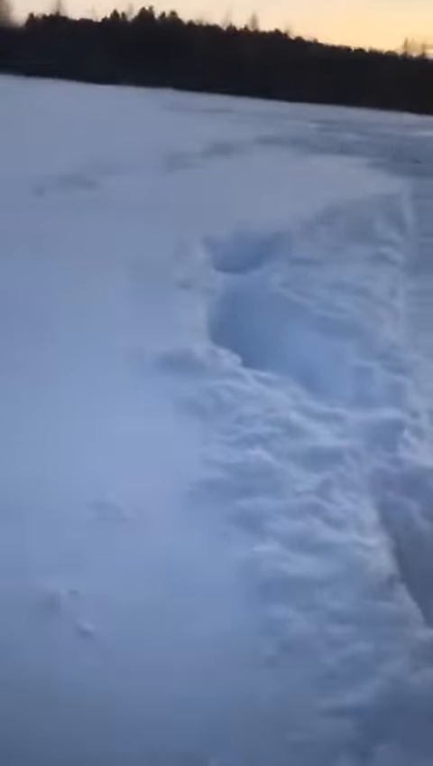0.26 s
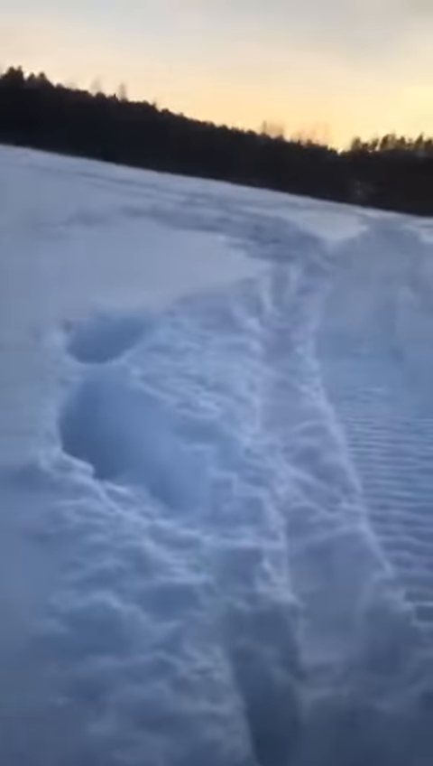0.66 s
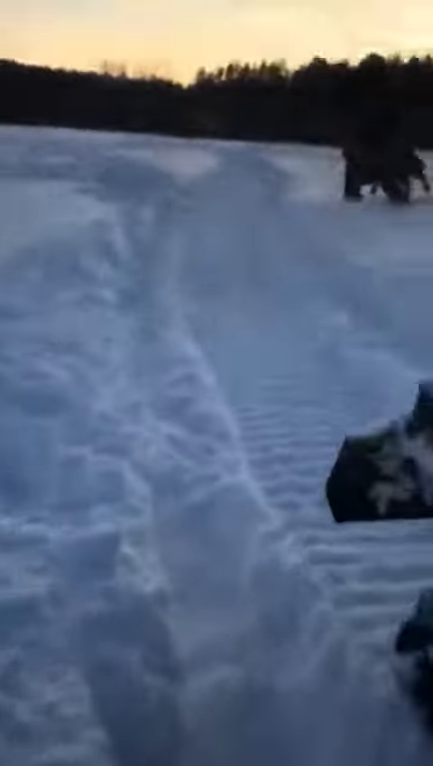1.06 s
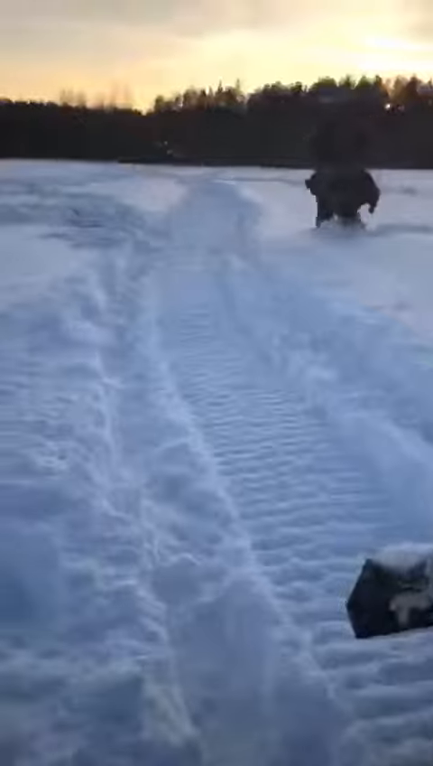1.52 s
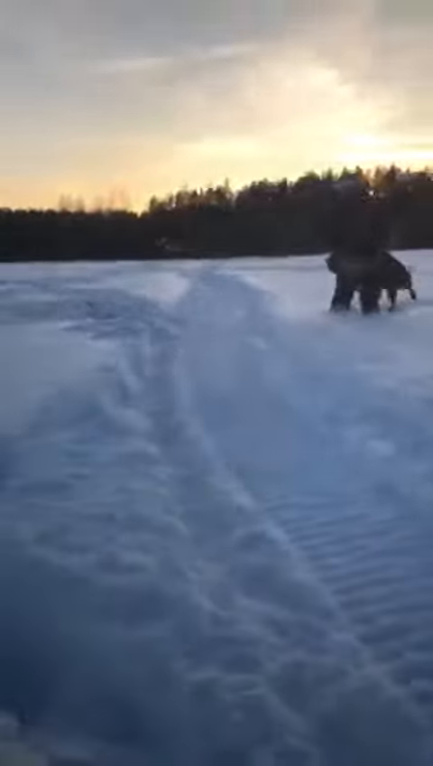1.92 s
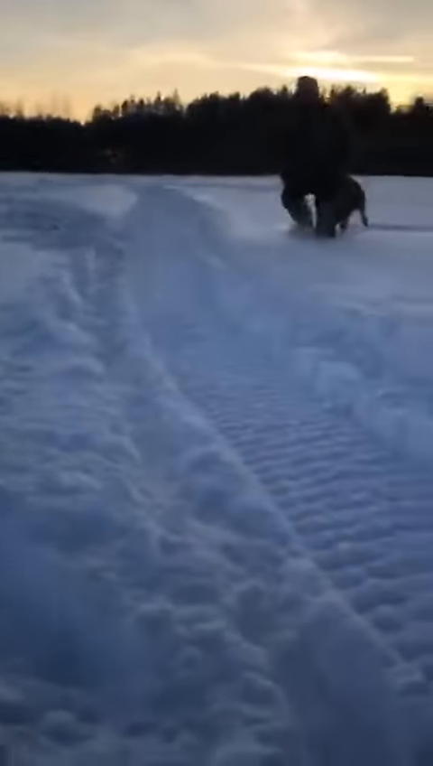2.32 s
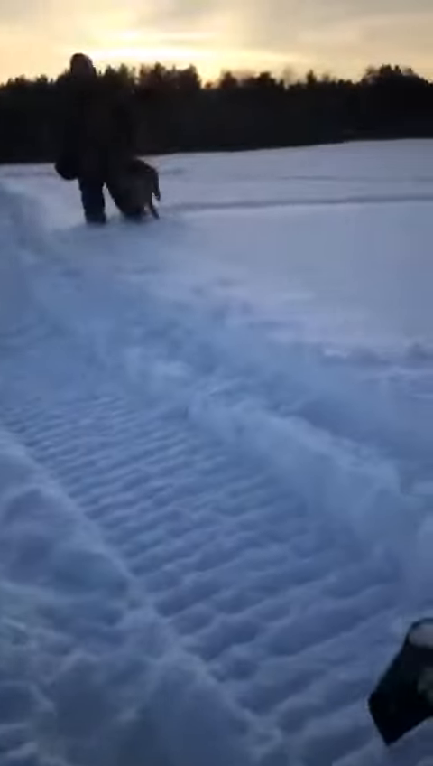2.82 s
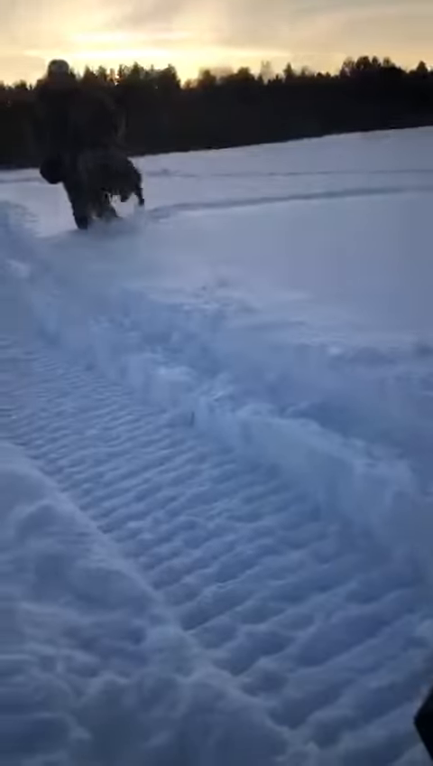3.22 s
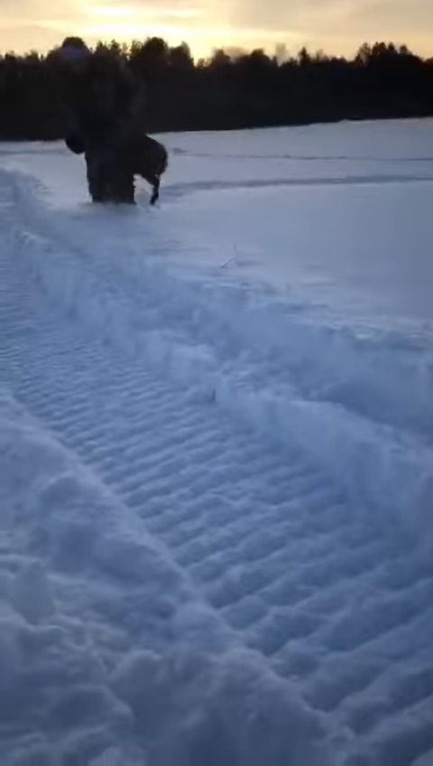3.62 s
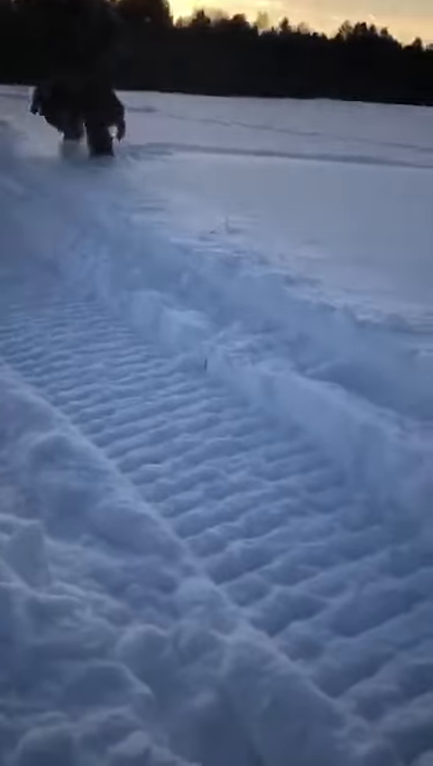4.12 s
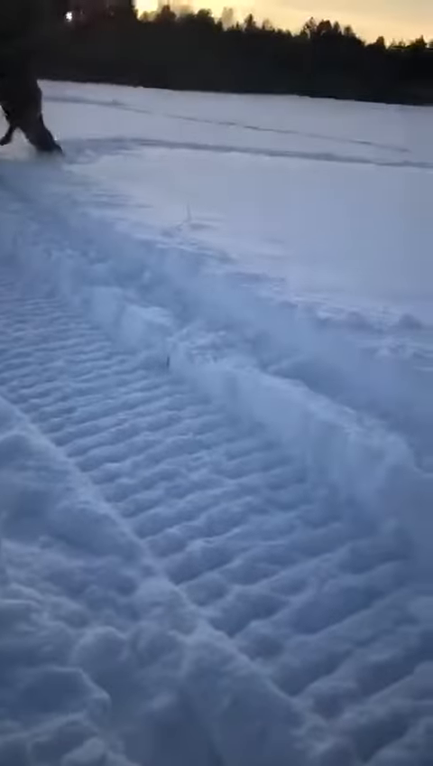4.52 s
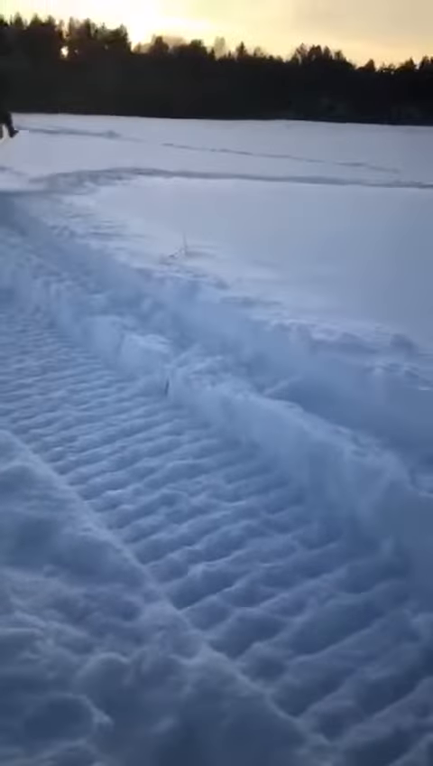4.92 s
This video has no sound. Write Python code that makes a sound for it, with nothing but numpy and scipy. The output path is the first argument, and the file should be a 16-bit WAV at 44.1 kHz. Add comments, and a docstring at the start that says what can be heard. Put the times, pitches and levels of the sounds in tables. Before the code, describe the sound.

A wild boar screams loudly in an open snowy field, with almost no echo. The first cry, a shrill, raspy whistle on a steady high pitch, is already under way, grows louder and drops off in a short yelp at about 1.3 seconds. At 1.6 a throaty creak climbs into a second scream, very hoarse at first, held until 2.7. Quick creaks at 3.1 open the third and strongest cry, which starts rough, rises in pitch and collapses at 4.7. A fourth creaks in just before 5 seconds and is still sounding at the end. Underneath, a nearby engine idles with a quieter, lumpy low throb, fading steadily as the microphone turns away. Soft, dull boot crunches in packed snow come irregularly, around 2.1 to 2.8, at 3.3, and most clearly near 4 seconds. A faint hiss of air runs throughout.

```python
"""A captured wild boar screams four times in an open snowy field, heard on one microphone.
A cry starts as a creak, then climbs to a shrill whistle that a slower vibration of the vocal folds
chops into side tones and rasp; the first is already under way. An engine idles close by, fading as
the microphone turns away. Boots press the snow, the air hisses faintly, and a weak, dull
reverberant tail follows the boar almost at once."""
import sys
import numpy as np
from scipy import signal
from scipy.fft import rfft, irfft, next_fast_len
from scipy.io import wavfile
from scipy.ndimage import uniform_filter1d

SR = 44100
rng = np.random.default_rng(int(sys.argv[2]) if len(sys.argv) > 2 else 0)


def bounce(signal):
    """Save signal as a 16-bit WAV file at the path given by the first command-line argument."""
    frames = np.transpose(np.atleast_2d(signal))
    limited = np.clip(frames, -1, 1)
    pcm = np.round(limited * 32767).astype(np.int16)
    wavfile.write(sys.argv[1], SR, pcm)


N = 227776
TIME = np.arange(N) / SR
FFT_SIZE = next_fast_len(N + SR // 10)
FREQS = np.fft.rfftfreq(FFT_SIZE, 1 / SR)

# Hiss over the field. Each row: frequency in Hz, relative level in dB.
AIR_SPECTRUM = [(350, -3), (550, 1.5), (700, -12.5), (900, -7), (1500, -18.5), (2100, -15.5), (3500, -19.5),
                (5600, -21.5), (10600, -28.5), (12000, -35), (15600, -55)]
# The engine's hum. Each row: multiple of the firing rate, relative level in dB.
ENGINE_ORDERS = [(1, -9.5), (2, -1), (3, 2.5), (4, -1), (5, -13.5), (6, -15), (7, -13), (8, -11), (9, -10),
                 (10, -23), (12, -41)]
# Rumble of its casing. Each row: frequency in Hz, relative level in dB.
RUMBLE_SPECTRUM = [(20, -27), (60, 3), (110, 3.5), (170, -6), (290, -2.5), (400, -10.5), (500, -6),
                   (620, -45), (1200, -20)]
# The microphone turns away from the engine. Each row: time in seconds, casing gain in dB.
ENGINE_FADE = [(0, -33.5), (1.3, -38.5), (2.3, -42), (3.5, -44), (4.3, -48), (5.16, -49.5)]
# Boots on snow. Each row: start in seconds, gain in dB, length in seconds, ring frequency in Hz.
BOOT_STEPS = [(0.115, -35, 0.051, 268), (0.22, -35.5, 0.034, 160), (0.664, -36, 0.036, 190.5),
              (1.242, -32, 0.039, 180), (2.123, -31, 0.024, 218), (2.251, -32.5, 0.019, 278),
              (2.444, -35.5, 0.037, 236.7), (2.542, -30, 0.02, 169), (2.61, -37, 0.035, 150.2),
              (2.803, -34, 0.021, 447), (3.226, -28.5, 0.032, 244), (3.304, -27.5, 0.058, 320),
              (3.927, -30, 0.065, 306.7), (3.95, -27, 0.049, 79.7), (4.032, -26, 0.047, 293),
              (4.121, -27, 0.034, 218.3), (4.151, -20.5, 0.044, 171)]
# Creaks ahead of a cry. Each row: start in seconds, relative peak in dB, tilt in dB per octave.
FOLD_CREAKS = [(1.582, -11.5, -2), (3.091, -6, 6.5), (3.108, -5, 3), (3.123, -0.5, 4), (4.928, -14.5, -1),
               (4.947, -7, -0.5), (4.963, -8.5, 5.5), (4.978, -8.5, -1)]
# What a creak rings. Each row: nominal frequency in Hz, relative level in dB, seconds to fall 60 dB.
THROAT_MODES = [(724.8, 6, 0.081), (1231.3, 6.5, 0.025), (2210, 10, 0.026), (2780, 3.5, 0.025),
                (4180, 0, 0.0053), (6034, -7.5, 0.016)]
# Tones beside each whistle partial. Each row: offset in multiples of the fold rate, gain in dB.
FOLD_SIDE_TONES = [(-2, -13), (-1.5, -33), (-1, -8), (-.5, -23), (.5, -23), (1, -4.5), (1.5, -15.5),
                   (2, -13.5)]
# The throat's colour. Each row: frequency in Hz, gain in dB.
THROAT_SPECTRUM = [(1100, -40), (1450, -7.5), (1700, 1), (1900, 4), (2150, 3), (2400, 7.5), (2820, -0.5),
                   (3020, -8.5), (3300, -15), (3850, -16.5), (4700, -15), (5200, -12.5), (5800, -18),
                   (7500, -19), (8500, -22.5), (9600, -21), (11500, -30.5)]
# Edges in Hz of the voice's core, mouth, upper, treble and fizz bands, low to high.
VOICE_EDGES_HZ = [1050, 2200, 3200, 5200, 8600, 12500]
# How a band follows the voice. Each row, by name: usual gain in dB, dB per dB of effort,
# dB per unit of roughness, dB per octave of held pitch, weight of the cry's brightness.
BAND_RULES = {"growl": (-35, 0.2, 20.5, 21, 1.94), "upper": (-26.5, 0.53, 9, -10.5, 1.53),
              "treble": (-26, 0.51, 3.5, -3, 0.77), "fizz": (-32, 0.53, -0.5, 9, 0.36)}
# Drift of the top two bands. Each row: time in seconds, treble offset in dB, fizz offset in dB.
TREBLE_DRIFT = [(.08, -5.5, 2), (.28, 5.5, -5.5), (.55, -3.5, 2.5), (.85, -3, 2.5), (1.03, 2, -3),
                (1.24, 2, -7), (1.8, 0.5, 1.5), (1.96, -1, 2), (2.15, -0.5, 2.5), (2.28, 4, -9),
                (2.41, 3.5, -4), (2.54, 1, 1.5), (3.2, -4.5, 0), (3.58, 1.5, 0), (3.8, 3.5, 2),
                (4.2, 0.5, -3.5), (4.6, -4, -3)]
# The cries. Each row: start and climb time in seconds, starting pitch in Hz, starting level in dB
# below the hold, end of the hold and collapse time in seconds, brightness in dB, first and last
# treble resonance in Hz before the jaw shifts it.
BOAR_CRIES = [(-.05, .04, 1400, 7, 1.33, 0.034, -2.5, 5950, 6500),
              (1.58, .105, 1200, 36, 2.668, 0.076, 0.5, 6400, 5700),
              (3.122, .046, 1399, 4, 4.632, 0.06, 0.6, 7330, 6400),
              (4.988, 0.055, 1098, -4, 5.244, .06, -0.5, 5950, 5700)]
# The held whistle, a list per cry. Each row: time in seconds, pitch in Hz, effort in dB.
CRY_HOLDS = [
    [(0.0, 1924, -20), (0.128, 1920, -22.5), (0.194, 1893, -20.5), (0.282, 1874, -26), (0.3, 1930, -24),
     (0.33, 1850, -28.5), (0.348, 1943, -20), (0.386, 1876, -20.5), (0.68, 1858, -14), (0.752, 1872, -16.5),
     (0.848, 1895, -11), (0.962, 1890, -15), (1.256, 1878, -10.5), (1.32, 1855, -11.5)],
    [(1.69, 1923, -23.5), (1.72, 1894, -16.5), (1.814, 1894, -10.5), (1.82, 1835, -12.5),
     (1.85, 1796, -11.5), (1.91, 1840, -17), (1.926, 1887, -18), (2.068, 1861, -13.5), (2.216, 1843, -17),
     (2.284, 1850, -14), (2.342, 1839, -20), (2.41, 1843, -21), (2.532, 1845, -13), (2.67, 1834, -11.5)],
    [(3.17, 1620, -21.5), (3.206, 1709, -16.5), (3.364, 1806, -12.5), (3.384, 1878, -13),
     (3.482, 2016, -18), (3.526, 1933, -9.5), (3.6, 1927, -14), (3.658, 1929, -11), (3.832, 1910, -18.5),
     (4.024, 1961, -13.5), (4.166, 1964, -16.5), (4.528, 2002, -11), (4.612, 1945, -9.5),
     (4.63, 2012, -7.5)],
    [(5.04, 1920, -26.5), (5.056, 2004, -18), (5.074, 2085, -20.5), (5.15, 2066, -14.5), (5.16, 2052, -15)],
]
# The mouth resonance, a list per cry. Each row: time in seconds, level in dB.
CRY_MOUTH = [
    [(0, -27.5), (.5, -26), (.9, -19.5), (1.1, -23.5), (1.27, -20)],
    [(1.7, -25.5), (1.82, -21), (1.93, -21.5), (2.04, -16.5), (2.24, -28), (2.37, -28), (2.52, -23.5),
     (2.67, -23.5)],
    [(3.15, -23), (3.24, -28), (3.45, -22), (3.57, -14.5), (3.68, -18.5), (3.85, -18.5), (4.13, -21),
     (4.38, -13.5), (4.62, -16.5)],
    [(5.035, -35), (5.06, -19), (5.14, -17.5)],
]
# Hoarseness, a list per cry. Each row: time in seconds, roughness from 0 to 1.
CRY_ROUGHNESS = [
    [(0, 0.29), (.35, 0.32), (.6, 0.28), (.8, 0.36), (1.03, 0.28), (1.14, 0.28), (1.27, 0.41)],
    [(1.62, 0.91), (1.7, 0.21), (1.78, .5), (1.86, 0.94), (1.93, 0.25), (2.03, .4), (2.2, 0.23),
     (2.4, 0.19), (2.68, .36)],
    [(3.14, 0.92), (3.33, .6), (3.43, .16), (3.5, 0.24), (3.56, .5), (3.8, 0.41), (4.02, 0.43),
     (4.38, 0.42), (4.62, 0.3)],
    [(4.99, .3), (5.01, 0.13), (5.04, 0.08), (5.055, 0.36), (5.16, 0.36)],
]

USUAL_HZ, USUAL_DB, USUAL_ROUGH = 1900, -14, .33  # pitch, effort and roughness of an ordinary scream


def amp(db):
    """Decibels to gain."""
    return 10 ** (np.asarray(db) / 20)


def unit_rms(x):
    """Scales to rms 1."""
    return x / np.sqrt(np.mean(x ** 2) + 1e-20)


def levelled(x, size=900):
    """Holds the short-term rms at 1."""
    power = uniform_filter1d(uniform_filter1d(x ** 2, size), size)
    return x / np.sqrt(abs(power) + 1e-12)


def follow(rows):
    """The columns of a curve table at every sample."""
    times, *columns = np.transpose(rows)
    return [np.interp(TIME, times, column) for column in columns]


def colour(x, points):
    """Filters by a spectrum of (Hz, dB) points."""
    hz, db = np.transpose(points)
    gain = amp(np.interp(np.log(FREQS + 1), np.log(hz), db))
    return irfft(rfft(x, FFT_SIZE) * gain, FFT_SIZE)[:N]


def band(x, low_hz, high_hz, order=16):
    """Keeps one band; a higher order steepens its edges."""
    loss = (1 + (low_hz / (FREQS + 1)) ** order) * (1 + (FREQS / high_hz) ** order)
    return irfft(rfft(x, FFT_SIZE) / loss, FFT_SIZE)[:N]


def wander(hz):
    """A smooth random curve of rms 1, moving at up to about this rate."""
    spectrum = rfft(rng.standard_normal(FFT_SIZE)) / (1 + (FREQS / hz) ** 4)
    return unit_rms(irfft(spectrum, FFT_SIZE)[:N])


def resonate(x, hz, width_hz):
    """A resonance of gain 1 that follows the curve hz."""
    turn = np.exp(2j * np.pi * np.cumsum(hz) / SR)
    pole = np.exp(-np.pi * width_hz / SR)
    return 2 * (turn * signal.lfilter([1 - pole], [1, -pole], x / turn)).real


def add(mix, start_s, sound):
    """Mixes a sound in at a time."""
    part = mix[max(round(start_s * SR), 0):][:len(sound)]
    part += sound[:len(part)]


def air(level_db=-45):
    """Faint, slightly restless hiss over the open field."""
    return amp(level_db + 0.81 * wander(26)) * unit_rms(colour(rng.standard_normal(N), AIR_SPECTRUM))


def reverb_tail(x, delay_s=0.019, decay_db_per_s=35, gain_db=-41):
    """A weak, dull reverberant tail follows the direct sound almost at once."""
    t = np.arange(SR) / SR
    tail = rng.standard_normal(SR) * amp(-decay_db_per_s * t) * (t > delay_s)
    reverb = signal.fftconvolve(x, tail / np.linalg.norm(tail))[:N]
    return amp(gain_db) * band(reverb, 500, 5000, order=3)


def engine(firing_hz=31.48, exhaust_db=-29, throb_db=2, lumps_db=2):
    """A lumpy idle close by: deep throbbing exhaust, and a casing whose drone and rumble fade faster."""
    casing_db, = follow(ENGINE_FADE)
    firings = np.cumsum(firing_hz * (1 + 0.01095 * wander(2.885))) / SR
    hum = sum(amp(db) * (1 + 0.3 * wander(8.4)) * np.cos(2 * np.pi * (k * firings + rng.random()))
              for k, db in ENGINE_ORDERS)
    exhaust, drone = band(hum, 15, 115), band(hum, 138, 600)
    pulses = rng.standard_normal(N) * (1 + .5 * np.cos(2 * np.pi * firings))
    rumble = colour(pulses * amp(lumps_db * wander(22)), RUMBLE_SPECTRUM)
    casing = amp(-3) * unit_rms(drone) + unit_rms(band(rumble, 18, 1310, order=4))
    idle_db = exhaust_db + 0.73 * (casing_db - casing_db[0]) + throb_db * wander(7)
    return amp(idle_db) * unit_rms(exhaust) + amp(casing_db) * casing


def boots(slips_per_s=260, ring_s=0.00087):
    """Packed snow gives way underfoot in a run of small dull slips."""
    out, t = np.zeros(N), np.arange(SR // 50) / SR
    for start, db, length, hz in BOOT_STEPS:
        size = int(length * SR)
        slips = rng.standard_normal(size) * (0.13 + (rng.random(size) < slips_per_s / SR))
        ring = np.sin(2 * np.pi * hz * t) * np.exp(-t / ring_s)
        crunch = signal.fftconvolve(slips * signal.windows.tukey(size, .5), ring)
        add(out, start, amp(db) * unit_rms(crunch))
    return band(out, 90, 770, order=6)


def creaks(gain_db=-3, scrape_s=0.011):
    """Single slaps of the boar's slack folds ring its throat."""
    out, t = np.zeros(N), np.arange(SR // 20) / SR
    for start, peak_db, tilt in FOLD_CREAKS:
        ring = 0
        for hz, db, t60 in THROAT_MODES:
            decay = amp(db + tilt * np.log2(hz / 2000) - 60 * t / t60)
            ring += decay * np.sin(2 * np.pi * hz * rng.uniform(0.835, 1.08) * t)
        creak = ring + 0.54 * rng.standard_normal(len(t)) * np.exp(-t / scrape_s)
        add(out, start, amp(peak_db + gain_db) * creak / abs(creak).max())
    return band(out, 430, 7840, order=6)


def cry_controls(row, hold, mouth, roughness, attack_s=0.028, sag=.36, drop_db=-50.5):
    """One cry climbs, holds, then collapses: the pitch sags, the level drops, the voice roughens."""
    start, climb_s, start_hz, start_db, end, collapse_s, bright_db, first_hz, last_hz = row
    (hold_hz, hold_db), (mouth_db,), (rough,) = follow(hold), follow(mouth), follow(roughness)
    climb_left = 1 - np.clip((TIME - start) / climb_s, 0, 1)
    collapse = np.clip((TIME - end) / collapse_s, 0, 1)
    hz = (hold_hz + (start_hz - hold_hz) * climb_left) * (1 - sag * collapse ** 1.05)
    octaves = np.log2(hold_hz / USUAL_HZ)
    swell_db = -start_db * climb_left ** 2
    gate = np.clip((TIME - start) / attack_s, 0, 1) * (collapse < 1) * amp(drop_db * collapse ** 1.9)
    # The folds chop deeper when hoarse, less when forced, and lock on only while the whistle holds.
    depth = 0.65 + 0.53 * (rough - USUAL_ROUGH) - 0.06 * (hold_db - USUAL_DB)
    depth = np.clip(depth * (1 - np.sqrt(climb_left)) * (1 - collapse), 0, 1)
    rough = np.clip(rough + .55 * collapse, 0, 1)
    treble_hz = np.interp(TIME, [start, end], [first_hz, last_hz])
    return np.broadcast_arrays(hz, octaves, hold_db + swell_db, mouth_db + swell_db, rough, depth,
                               climb_left, collapse, gate, bright_db, treble_hz)


def cry_sequence():
    """The controls of all four cries; each takes over in the pause before it."""
    controls = 0
    for row, *curves in zip(BOAR_CRIES, CRY_HOLDS, CRY_MOUTH, CRY_ROUGHNESS):
        controls = np.where(TIME >= row[0] - .1, cry_controls(row, *curves), controls)
    return controls


def larynx(hz, depth, rough, bend=0.36, fray_db=2, buzz_db=-4.5, rasp_db=1):
    """A whistle and overtones, chopped by folds four times slower; rough stretches jitter and rasp."""
    fold_slip = 1 + .07 * rough * wander(9)
    jitter = 0.01808 * rough + 0.0502 * rough ** 4  # at full roughness the whistle tears apart
    pitch = hz * (1 + 0.00523 * wander(27.87) + jitter * wander(245.5))
    whistle_phase = 2 * np.pi * np.cumsum(pitch) / SR
    fold_hz = pitch / 4 * (fold_slip + .05 * rough * wander(207.15))
    fold_phase = 2 * np.pi * np.cumsum(fold_hz) / SR
    # Each fold cycle tugs at the whistle, so higher overtones carry more side tones.
    tugged = whistle_phase + bend * depth * np.sin(fold_phase)
    overtones = sum(amp(fray_db * wander(28)) * np.exp(1j * k * (tugged + k)) for k in range(2, 7))
    side_tones = sum(amp(db) * np.exp(1j * m * (fold_phase + m)) for m, db in FOLD_SIDE_TONES)
    chop = 1 + depth * (1 + 0.22 * wander(38)) * side_tones
    tone = ((np.exp(1j * whistle_phase) + overtones) * chop).real
    # High harmonics of the folds' own slapping, spread over each cycle.
    buzz = sum(np.cos(n * fold_phase + 2 * np.pi * n * n / 25) for n in range(9, 25))
    # Air escapes in one puff a fold cycle.
    puffs = rng.standard_normal(N) * (1 + 0.49 * np.cos(fold_phase)) * (1 + 0.29 * wander(40))
    rasp = colour(puffs, [(1000, 4.5), (1900, 3.5), (2600, 10.1), (3800, 11.5), (6000, 11), (1e4, 20.3)])
    return tone + amp(buzz_db) * depth * buzz + amp(rasp_db) * rough * rasp


def flicker(x, depth_db=3.5):
    """Patches of the treble swell and fade at random."""
    hz, _, spectra = signal.stft(x, SR, nperseg=512)
    patches = rng.standard_normal(spectra.shape[::-1]).T
    for _ in range(2):
        patches = uniform_filter1d(uniform_filter1d(patches, size=6, axis=0), size=16, axis=1)
    reach = np.interp(hz, [2400, 4000], [0, 1])[:, None]
    return signal.istft(spectra * amp(depth_db * reach * unit_rms(patches)), SR, nperseg=512)[1][:N]


def throat(source, hz, rough, treble_hz, snout_hz=3920):
    """Throat and snout shape the voice into bands; two resonances move as the jaw opens with pitch."""
    voice = flicker(colour(source, THROAT_SPECTRUM))
    core, mouth, upper, treble, fizz = (band(voice, low, high, order=40)
                                        for low, high in zip(VOICE_EDGES_HZ, VOICE_EDGES_HZ[1:]))
    jaw = np.sqrt(hz / USUAL_HZ) * (1 + 0.045 * wander(4))
    upper += 2 * resonate(upper, snout_hz * jaw, width_hz=900)
    treble += 2 * resonate(treble, treble_hz * jaw, width_hz=1300)
    growl = band(source + .6 * rough * rng.standard_normal(N), 767, 1257, order=8)
    treble_db, fizz_db = follow(TREBLE_DRIFT)
    return dict(growl=levelled(growl), core=levelled(core), mouth=levelled(mouth), upper=levelled(upper),
                treble=levelled(treble) * amp(treble_db), fizz=levelled(fizz) * amp(fizz_db))


def screams(unsteady_db=1.5, whoop_db=-27, yelp_db=-7):
    """The boar's larynx sounds through its throat; effort, roughness and pitch balance the bands."""
    (hz, octaves, effort_db, mouth_db, rough, depth,
     climb_left, collapse, gate, bright_db, treble_hz) = cry_sequence()
    source = larynx(hz, depth, rough)
    bands = throat(source, hz, rough, treble_hz)
    scream = amp(effort_db) * bands["core"] + amp(mouth_db) * bands["mouth"]
    for name, (db, per_effort, per_rough, per_octave, per_bright) in BAND_RULES.items():
        strain_db = per_effort * (effort_db - USUAL_DB) + per_rough * (rough - USUAL_ROUGH)
        level_db = db + strain_db + per_octave * octaves + per_bright * bright_db
        scream += amp(level_db + unsteady_db * wander(18)) * bands[name]
    # The first overtone jumps out in the glides: a whoop going up, a yelp coming down.
    glide = amp(whoop_db) * np.sqrt(climb_left) + amp(yelp_db) * collapse
    scream += glide * levelled(resonate(source, 2 * hz, width_hz=350))
    return scream * uniform_filter1d(gate, size=400)


def scene():
    """The boar, its reverberation, boots, engine and air reach one microphone feeding both channels."""
    boar = screams() + creaks()
    mono = boar + reverb_tail(boar) + boots() + engine() + air()
    return np.array([mono, mono])


def record(dry, ceiling=.92, cutoff_hz=11900):
    """The recorder rounds peaks under full scale, then cuts the highest treble."""
    rounded = dry / (1 + (dry / ceiling) ** 8) ** (1 / 8)
    lowpass = signal.firwin(255, cutoff_hz, window=("kaiser", 9), fs=SR)
    return signal.oaconvolve(rounded, lowpass[None], "same")


dry = scene()
out = record(dry)
bounce(out)
```